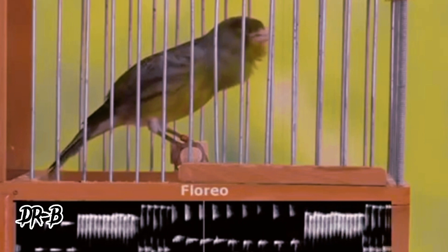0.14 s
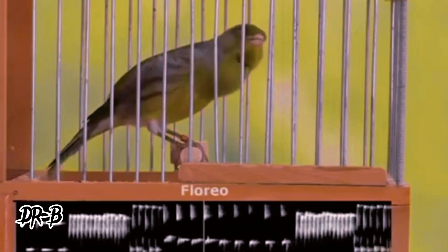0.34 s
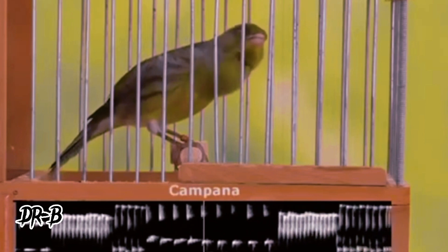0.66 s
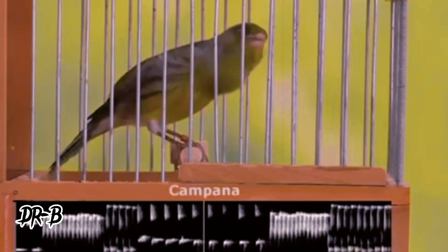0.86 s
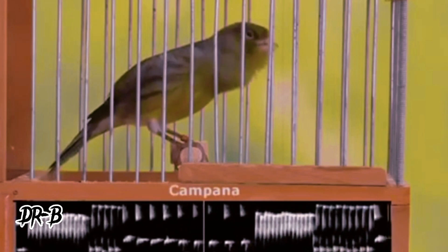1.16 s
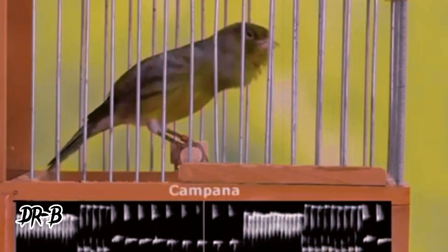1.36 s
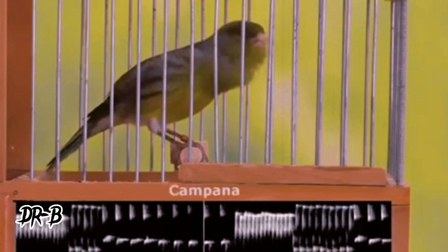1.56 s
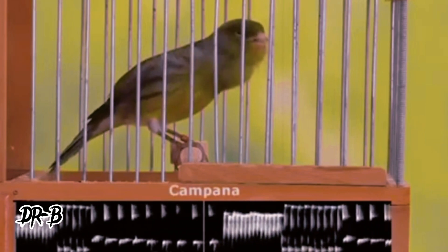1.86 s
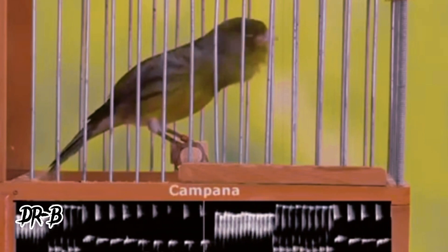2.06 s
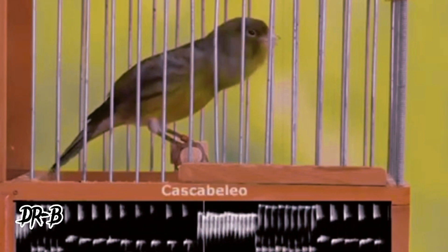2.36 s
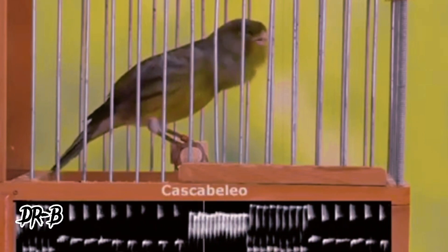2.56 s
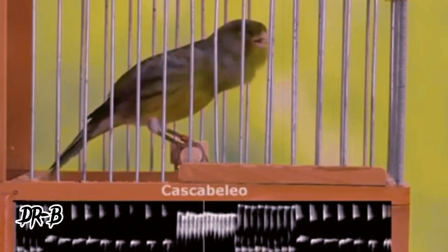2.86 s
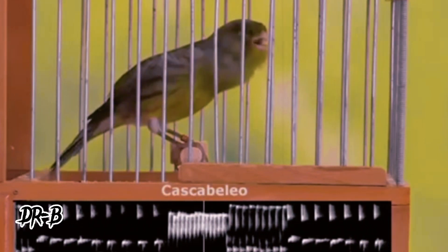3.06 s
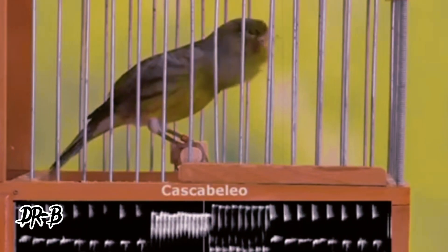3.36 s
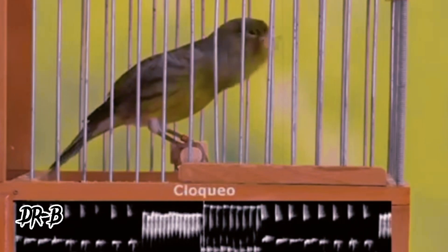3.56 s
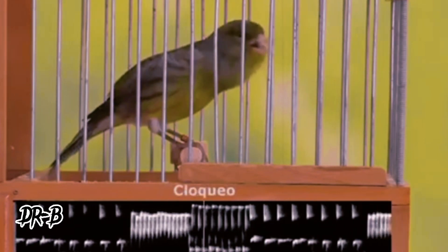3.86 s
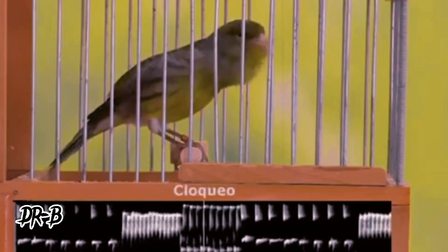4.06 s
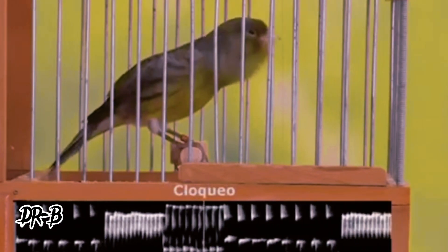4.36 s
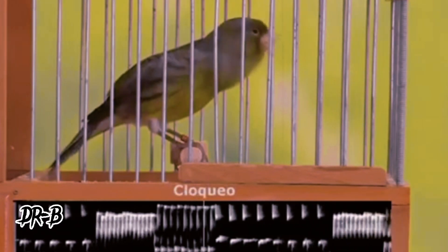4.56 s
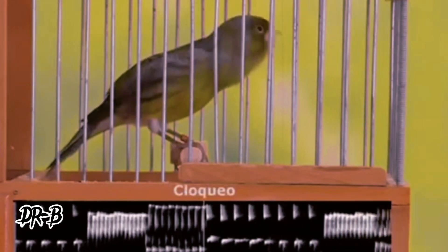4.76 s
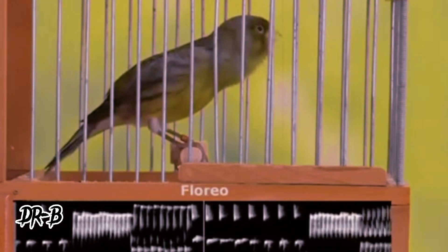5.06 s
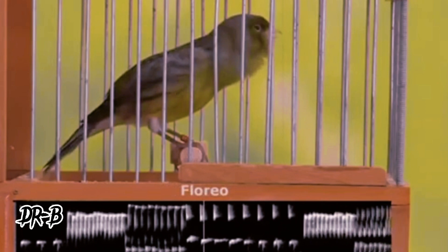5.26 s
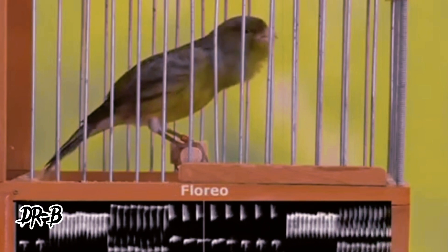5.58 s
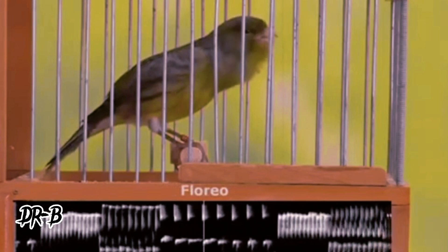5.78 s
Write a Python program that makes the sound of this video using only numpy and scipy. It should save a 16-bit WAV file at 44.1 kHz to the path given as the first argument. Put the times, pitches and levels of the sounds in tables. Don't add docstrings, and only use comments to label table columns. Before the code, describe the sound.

Close canary song with bright room echo moves from slow downward chirps to fast ones, a clucking roll, and cluck-and-whistle pairs over faint rumble.

```python
import sys
import numpy as np
from scipy import signal
from scipy.fft import rfft, irfft, next_fast_len
from scipy.io import wavfile
from scipy.ndimage import uniform_filter1d

SR = 44100
rng = np.random.default_rng(int(sys.argv[2]) if len(sys.argv) > 2 else 0)


def makeup_ratio(level_db):
    decades = np.asarray(level_db, float) / 20
    return 10 ** decades


def to_wav(s):
    ch = np.atleast_2d(s).T
    pcm = np.round(np.clip(ch, -1, 1) * 32767)
    wavfile.write(sys.argv[1], SR, pcm.astype(np.int16))


N = 261072
LEAD = SR // 2

# time_s, width_s, swell_db
TRAFFIC = [
    (-.1, 1, 11.5),
    (4.051, 1, 11.5),
    (5.8, 0.28, -23),
]
# freq_hz, level_db
RUMBLE_COLOUR = [(15, -2), (30, 9), (70, 11.5), (110, 0), (200, -44)]
# freq_hz, level_db
MURMUR_COLOUR = [(15, -22.5), (25, -7.5), (150, 1.5), (198, 1.5), (415, -3), (620, -9.5), (712, -9),
                 (831, -24), (1000, -3), (1300, -38), (2200, -120)]
# freq_hz, level_db
HISS_COLOUR = [(800, 9), (2000, 8.5), (6000, 8), (8000, 11.5), (10500, 13), (15000, 10.5)]
# delay_s, left_db, right_db
ECHOES = [(.0011, -2, -15.5), (.0027, -5, 0.5), (.0075, -1, -3.5), (0.013, -14.5, -5.5), (0.026, -7, -6.5),
          (0.045, -17.5, -11.5)]
# freq_hz, decay_s (time to fall 60 dB)
RING_TIMES = [(1000, 0.52), (2500, 0.45), (4500, 0.43), (7000, 0.48), (14000, 0.32)]
# freq_hz, level_db
VOICE_COLOUR = [(700, -18), (1450, -14.5), (2000, -9.5), (2600, 2.5), (3050, -4), (3500, -1.5), (4600, -2),
                (5500, -7), (7000, -12), (8000, -3), (9300, -3), (10500, -3), (13800, 6.5), (15200, -18)]
# freq_hz, level_db
BREATH_COLOUR = [(3000, -42), (6000, -14.5), (8500, 4.5), (11000, -3), (14000, -16), (16000, -4)]
# multiple, level_db (against the fundamental)
OVERTONES = [(2, -24.5), (3, -28), (4, -51)]
# knee_s (when the pitch plunges), length_s (top to knee), level_db
SLOW_SWEEPS = [(-.14, 0.15, -25.5), (0.074, .12, -27), (.283, .14, -27.5), (.507, .15, -27.5),
               (0.714, .13, -27.5), (.929, .15, -28), (1.157, .158, -28.5), (1.396, .17, -27.5),
               (1.624, .15, -29.5)]
# knee_s, length_s, level_db
FAST_SWEEPS = [(1.753, 0.07, -30), (1.87, 0.066, -31), (1.981, 0.075, -31), (2.092, 0.055, -31.5),
               (2.217, 0.073, -31), (2.337, 0.078, -31), (2.451, 0.069, -32.5), (2.566, 0.076, -31.5),
               (2.688, .063, -30), (2.814, 0.072, -31), (2.944, 0.072, -31.5), (3.074, 0.093, -30.5)]
# way (0 at the top, 1 at the knee), pitch_hz, effort_db
SLOW_SHAPE = [(-.05, 7090, -26.5), (0.023, 6970, -6), (.12, 6500, -16.5), (.428, 5070, -17.5),
              (.601, 4591, -1.5), (.902, 3670, -7), (0.988, 3176, -10), (1.087, 1324, -12.5),
              (1.108, 1030, -29.5)]
# way, pitch_hz, effort_db
FAST_SHAPE = [(-.07, 6712, -44), (0.028, 6422, -26), (0.45, 5046, -16.5), (0.602, 4620, -1.5),
              (0.784, 3883, -14), (0.918, 3324, -22), (1.038, 2722, -8), (1.159, 1290, -6.5),
              (1.198, 1030, -44)]
# start_s, level_db, head_pitch_hz
CLUCKS = [(3.141, -34, 3550), (3.2457, -29.5, 3350), (3.3537, -30, 3444), (3.458, -29, 3420),
          (3.5646, -29.5, 3320), (3.6648, -31, 3430), (3.776, -29, 3466), (3.8806, -30.5, 3324),
          (3.9852, -28.5, 3214), (4.0941, -30, 3332), (4.2964, -29.5, 3380), (4.4945, -29, 3540),
          (4.698, -31, 3324), (4.9082, -29.5, 3323), (5.1154, -31.5, 3470), (5.3177, -30.5, 3330),
          (5.5362, -30.5, 3173)]
# after_start_s, pitch_share (of the head pitch), effort_db
HEAD_STROKE = [(-.0015, 1.08, -50.5), (.0005, 1.03, -6.5), (.009, .98, -15), (0.012, 1.1, -10.5)]
# after_start_s, pitch_hz, effort_db
RISE_STROKE = [(.009, 1479, -32.5), (0.012, 1814, -11), (.017, 1891, -9), (.02, 2168, -7.5),
               (.024, 2413, -11), (.032, 2535, -14.5), (0.045, 2435, -40.5)]
# after_start_s, pitch_hz, effort_db
CHIP_STROKE = [(0.041, 3944, -30.5), (0.046, 4117, -1.5), (.048, 3700, 3.5), (0.054, 3400, -12)]
# after_start_s, pitch_hz, effort_db
TICK_STROKE = [(.06, 5896, -35), (.063, 5460, -15), (.074, 5000, 1.5), (.08, 4660, -33)]
# after_start_s, pitch_hz, effort_db
PUFF_STROKE = [(.058, 6040, -30), (.063, 5730, -11), (.072, 5500, 4), (.08, 4780, -0.5)]
# start_s, final_pitch_hz, level_db, swell_db (growth in strength)
WHISTLES = [(4.196, 4625, -25.5, 0.5), (4.391, 4606, -26.5, 2.5), (4.591, 4614, -26, -0.5),
            (4.792, 4632, -25.5, 8.5), (4.998, 4530, -28.5, 9), (5.2, 4585, -27, 6),
            (5.404, 4573, -28.5, 4), (5.633, 4564, -31.5, -1.5)]
# time_s, pitch_hz, level_db
GLIDE = [(5.785, 4140, -72), (5.809, 4035, -57.5), (5.851, 3827, -43.5), (5.882, 3640, -38),
         (5.91, 3361, -35.5), (5.93, 3010, -35)]
# freq_hz, under_db (below the loudest sound)
DROP_DEPTH = [(5000, 52), (6500, 43), (8000, 51), (10000, 44.5), (13000, 38.5), (15000, 47)]
# freq_hz, level_db
SIDE_KEPT = [(5500, 1.5), (7000, -10), (7600, -22), (9300, -6.5), (11200, -30.5), (11800, 11.5),
             (15000, -6)]


def unit(x):
    return x / np.sqrt(np.mean(x ** 2) + 1e-20)


def smooth_noise(count, size):
    return unit(uniform_filter1d(rng.standard_normal(count), size=size))


def filtered(x, points):
    m = next_fast_len(x.shape[-1] + 8192)
    hz, db = np.transpose(points)
    log_hz = np.log(np.fft.rfftfreq(m, 1 / SR) + 1)
    gain = makeup_ratio(np.interp(log_hz, np.log(hz), db))
    return irfft(rfft(x, m) * gain, m)[..., :x.shape[-1]]


def background():
    t = np.arange(N) / SR
    swell_db = sum(db * np.exp(-((t - s) / width) ** 2) for s, width, db in TRAFFIC)
    noise = rng.standard_normal((2, 2, N)) + 0.48 * rng.standard_normal((2, 1, N))
    rumble = makeup_ratio(-90 + swell_db) * unit(filtered(noise[0], RUMBLE_COLOUR))
    murmur_db = -75 + 0.1 * swell_db
    murmur = makeup_ratio(murmur_db) * unit(filtered(noise[1], MURMUR_COLOUR)) * makeup_ratio([[-1], [1]])
    hiss_noise = rng.standard_normal((2, N)) + 1.3 * rng.standard_normal(N)
    hiss = makeup_ratio(-69) * unit(filtered(hiss_noise, [(300, -44.0)] + HISS_COLOUR + [(16000, -54)]))
    hum = makeup_ratio(-81.5 + 4.2 * smooth_noise(N, 3000)) * np.sin(2 * np.pi * 120 * t)
    return rumble + murmur + hiss + hum * makeup_ratio([[-3], [2]])


def room_tail():
    hz, t, z = signal.stft(rng.standard_normal((2, SR // 2)), SR, nperseg=256)
    decay_s = np.interp(hz, *np.transpose(RING_TIMES))[:, None]
    a, b = signal.istft(z * makeup_ratio(-60 * t / decay_s), SR, nperseg=256)[1]
    turn = np.arccos(0.5) / 2
    common, apart = np.cos(turn) * a, np.sin(turn) * b
    tail = np.array([common + apart, common - apart])
    tail *= 1 - np.exp(-np.arange(len(a)) / SR / 0.0039)
    return makeup_ratio(2.0) * tail / np.linalg.norm(tail[0])


def room():
    tail = room_tail()
    echoes = np.zeros_like(tail)
    t = np.arange(300) / SR
    for delay_s, left_db, right_db in ECHOES:
        scatter = rng.standard_normal(300) * makeup_ratio(-60 * t / (0.0016 + 0.1 * delay_s))
        scatter /= np.linalg.norm(scatter)
        echoes[:, round(delay_s * SR):][:, :300] += np.outer(makeup_ratio([left_db, right_db]), scatter)
    answer = tail + filtered(echoes, [(1500, -6.5), (2600, 0), (4000, -0.5), (15000, 4.5)])
    answer[:, 0] += 1
    return answer


def stroke(song, times, pitch_hz, level_db, flutter=.003, bright_db=4.64, even_db=-5):
    k = np.arange(round(times[0] * SR), min(round(times[-1] * SR), N))
    shake = smooth_noise(SR // 4, 60)[:len(k)]
    hz = np.exp(np.interp(k / SR, times, np.log(pitch_hz))) * (1 + flutter * shake)
    phase = 2 * np.pi * np.cumsum(hz) / SR
    overtones = 0
    for n, db in OVERTONES:
        strength = makeup_ratio(db + bright_db + even_db * (n == 2))
        overtones = overtones + strength * np.sin(n * phase) * (n * hz < SR / 2.5)
    ripple_db = smooth_noise(SR // 4, 180)[:len(k)] * min(800 * flutter, 3)
    effort = makeup_ratio(np.interp(k / SR, times, level_db) + ripple_db)
    song[0, k + LEAD] += np.sqrt(2) * effort * (np.sin(phase) + overtones)
    song[1, k + LEAD] += effort * np.sqrt(flutter)


def sweeps(song, rows, shape, flutter):
    way, hz, effort_db = np.transpose(shape)
    for knee_s, length_s, db in rows:
        beak_db = rng.normal(0.98, 3.9)
        stroke(song, knee_s + (way - 1) * length_s, hz, db + effort_db, flutter=flutter, bright_db=beak_db)


def clucks(song):
    t = np.arange(200) / SR
    for s, level_db, head_hz in CLUCKS:
        before_whistles = s + .12 < WHISTLES[0][0]
        last, last_db = (TICK_STROKE, -11) if before_whistles else (PUFF_STROKE, -22)
        uneven_db = 0.15 * rng.standard_normal(4) * [0, 0, 1, 1]
        levels_db = level_db + np.array([0.5, 0, -16.5, last_db]) + uneven_db
        head = np.multiply(HEAD_STROKE, [1, head_hz, 1])
        shapes, flutters = (head, RISE_STROKE, CHIP_STROKE, last), (0.0047, 0.012, 0.03, .08)
        for shape, db, flutter in zip(shapes, levels_db, flutters):
            after, hz, effort_db = np.transpose(shape)
            stroke(song, s + after, hz, db + effort_db, flutter=flutter, bright_db=-1.5, even_db=4.5)
        snap = np.diff(rng.standard_normal(len(t) + 1)) * makeup_ratio(levels_db[3] - 18.5 - 60 * t / .004)
        song[0, LEAD + round((s + .072) * SR):][:len(t)] += snap


def whistles(song):
    way = np.array([-.15, .05, .2, .5, .85, 1])
    sag = np.array([-.5, 0, .45, .8, 1, 1])
    shape_db = np.array([-21.5, -6.5, -2.5, 0.5, -5.5, -56])
    for s, last_hz, db, swell_db in WHISTLES:
        length_s = .064 + 0.013 * (s - WHISTLES[0][0])
        times = s + way * length_s
        level_db = db + shape_db + swell_db * (2 * way - 1)
        pitch_hz = last_hz + (1 - sag) * 60
        stroke(song, times, pitch_hz, level_db, flutter=.001, bright_db=-2.0, even_db=-1.0)
        stroke(song, times, pitch_hz + 24, level_db - 10.5, flutter=.001, bright_db=-32)


def new_glide(song):
    stroke(song, *np.transpose(GLIDE), flutter=.001, bright_db=4, even_db=6)


def canary():
    song = np.zeros((2, LEAD + N))
    sweeps(song, SLOW_SWEEPS, SLOW_SHAPE, flutter=0.0024)
    sweeps(song, FAST_SWEEPS, FAST_SHAPE, flutter=0.0047)
    clucks(song)
    whistles(song)
    new_glide(song)
    breath = song[1] * unit(filtered(rng.standard_normal(LEAD + N), BREATH_COLOUR))
    return filtered(song[0] + makeup_ratio(-16.5) * breath, VOICE_COLOUR)


def scene():
    answer = room()
    heard = signal.fftconvolve(canary()[None], answer, axes=1)[:, LEAD:LEAD + N]
    return heard * makeup_ratio([[.7], [-.7]]) + background()


def without_hidden_treble(x):
    hz, t, z = signal.stft(x, SR, nperseg=1152)
    power = np.mean(np.abs(z[:, 1:]) ** 2, 0)
    bands = power.reshape(-1, 16, len(t)).sum(1)
    centre = hz[1:].reshape(-1, 16).mean(1)
    drop_hz, under_db = np.transpose(DROP_DEPTH)
    total = np.sqrt(power.sum(0))
    limit = np.maximum(total * makeup_ratio(-np.interp(centre, drop_hz, under_db))[:, None], makeup_ratio(-82.0))
    above_khz = np.subtract.outer(centre, centre) / 1000
    high_tone = np.clip(centre / 1000 - 5.2, 0, 3)
    reach = np.where(above_khz > .55, makeup_ratio(-2 * (30 + 2.6 * above_khz - 6.5 * high_tone)), 0)
    limit = np.maximum(limit, np.sqrt(reach @ bands))
    waver_db = 6.3 * unit(uniform_filter1d(rng.standard_normal(bands.shape), size=4, axis=1))
    keep = (np.sqrt(bands) > limit * makeup_ratio(waver_db)) | (centre < drop_hz[0])[:, None]
    z[:, 1:] *= np.repeat(np.where(keep, 1, makeup_ratio(-40)), 16, 0)
    return signal.istft(z, SR, nperseg=1152)[1][:, :N]


def band_limit(x):
    return signal.sosfilt(signal.butter(12, 15440, fs=SR, output="sos"), x)


def record(dry):
    left, right = without_hidden_treble(dry)
    mid = (left + right) / 2
    side = filtered((left - right) / 2, SIDE_KEPT)
    return band_limit(np.array([mid + side, mid - side]))


dry = scene()
out = record(dry)
to_wav(out)
```